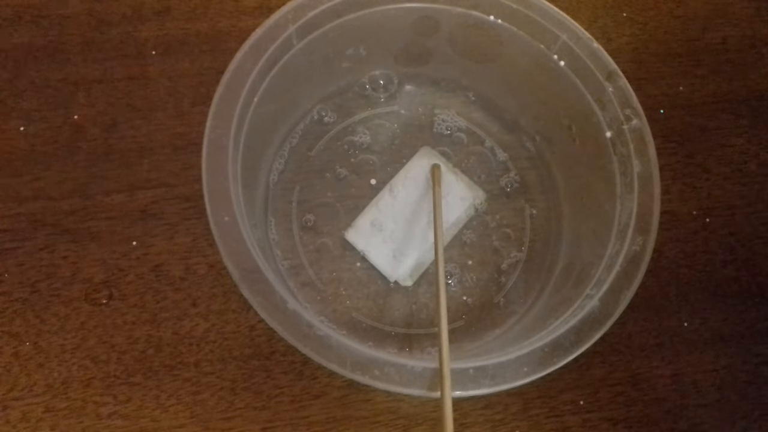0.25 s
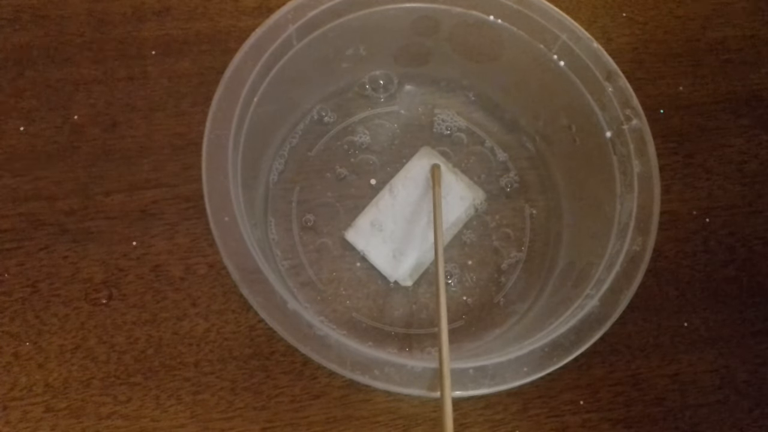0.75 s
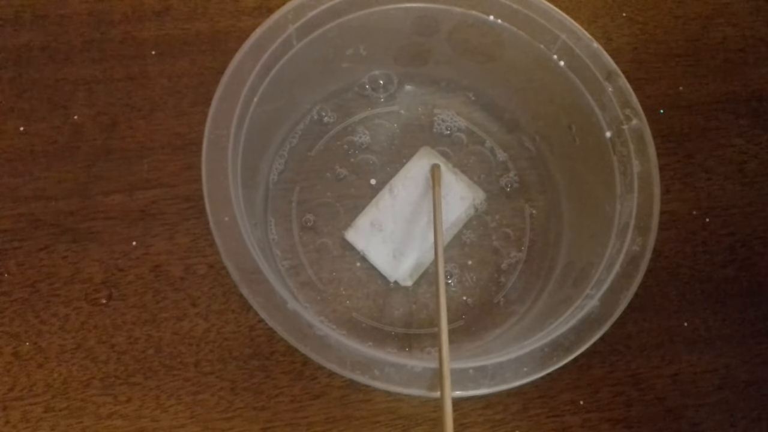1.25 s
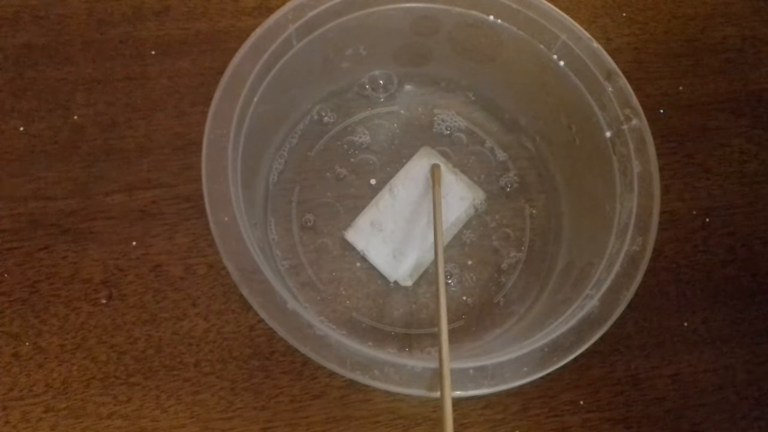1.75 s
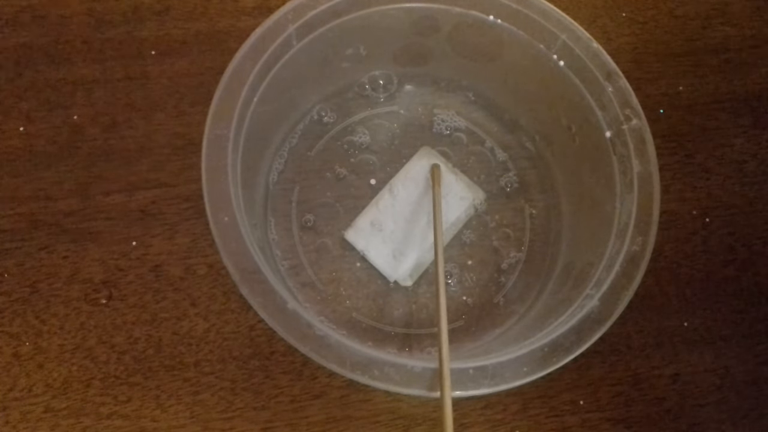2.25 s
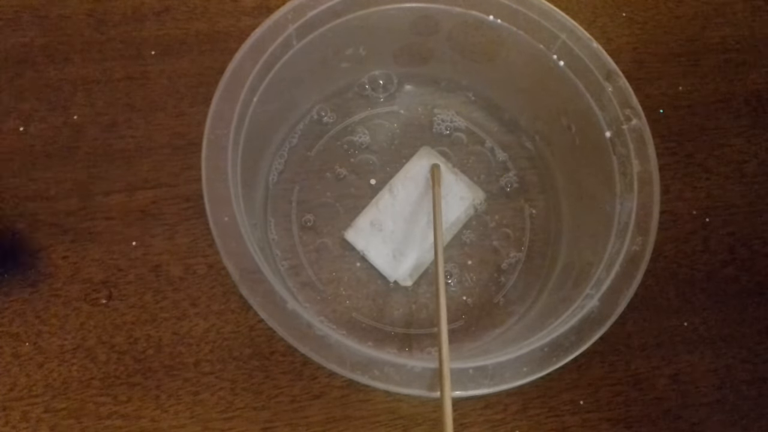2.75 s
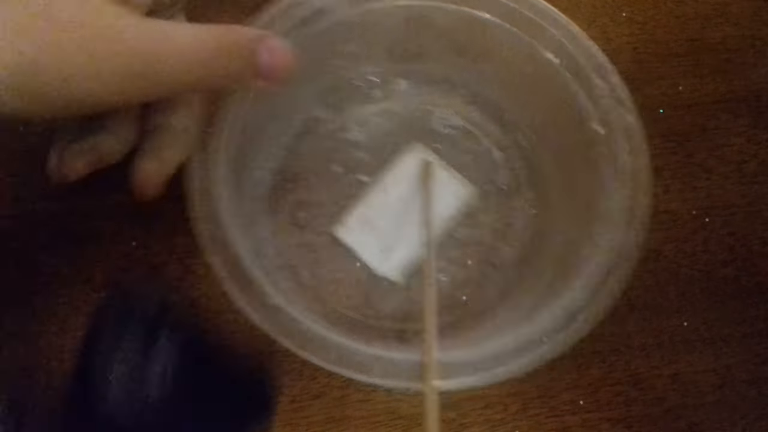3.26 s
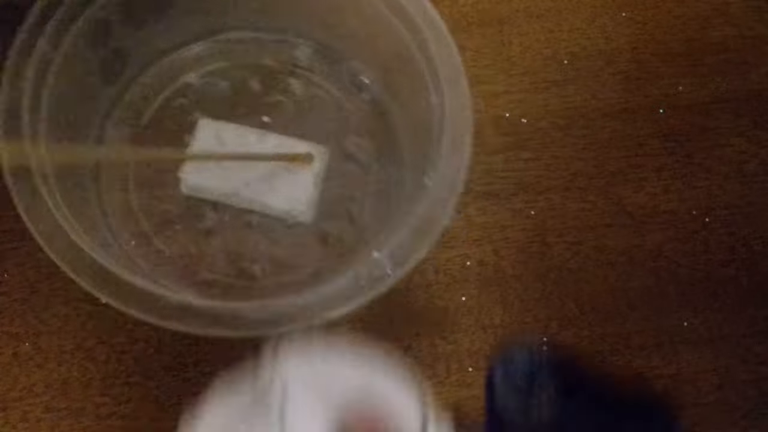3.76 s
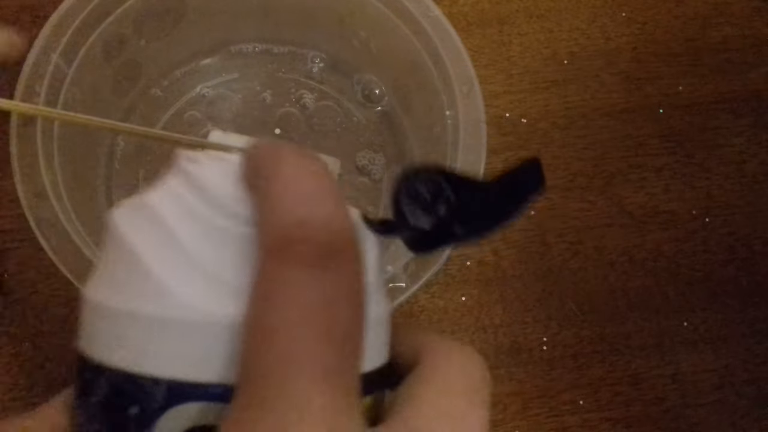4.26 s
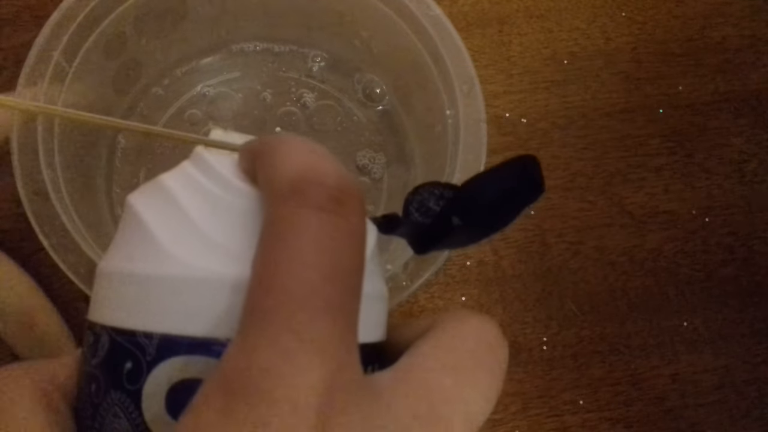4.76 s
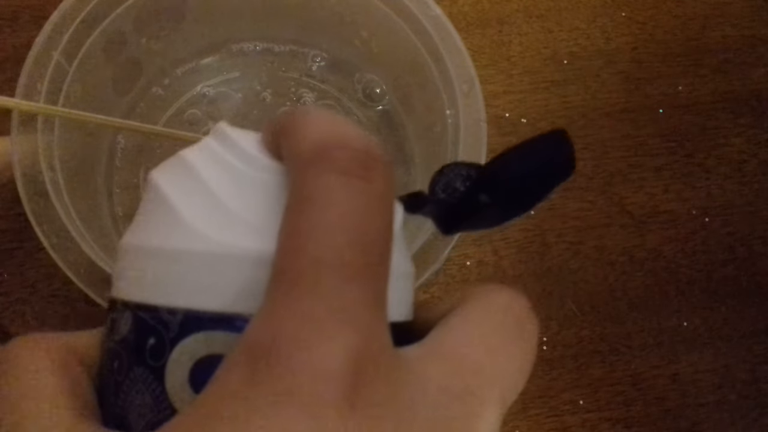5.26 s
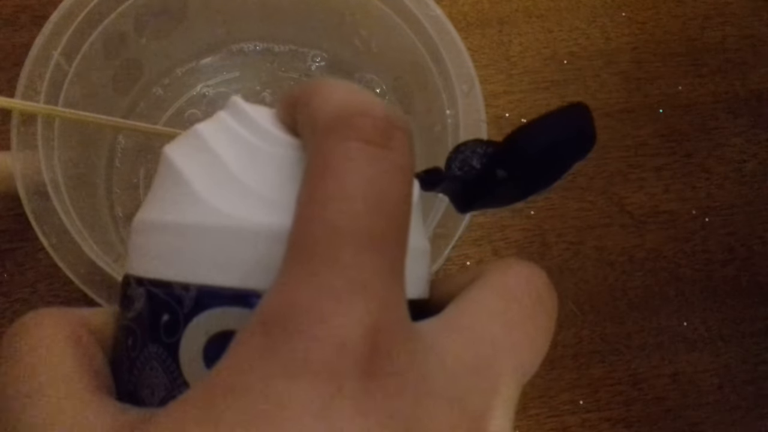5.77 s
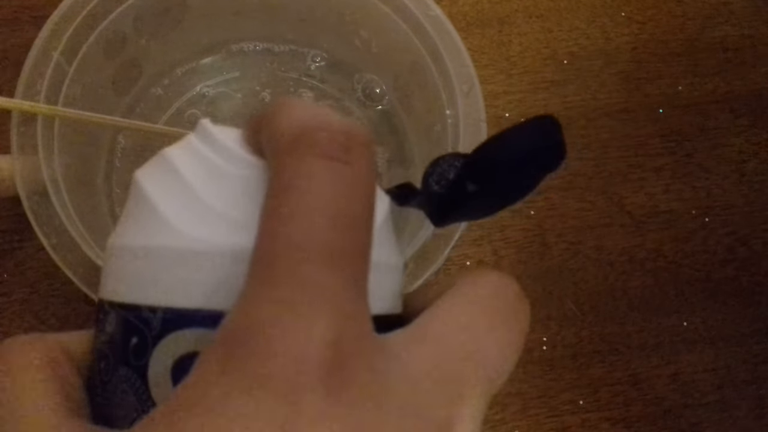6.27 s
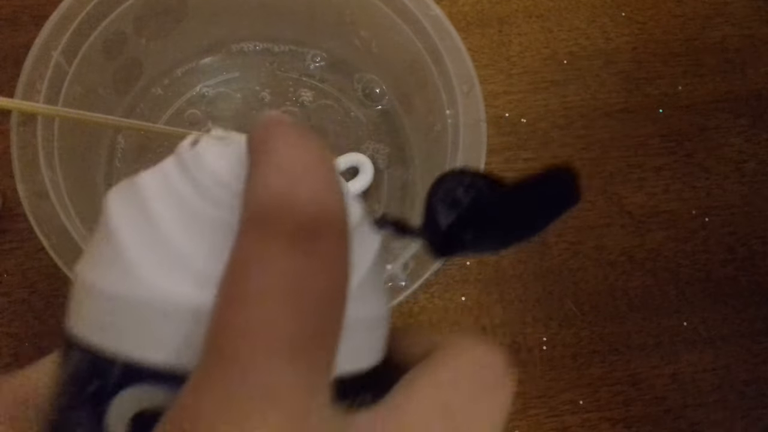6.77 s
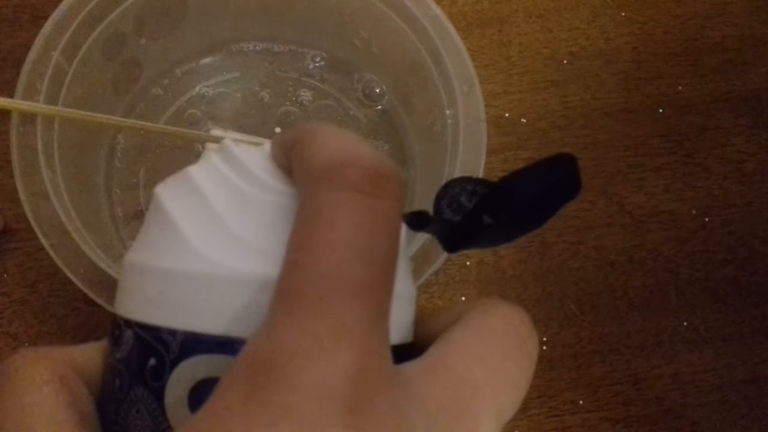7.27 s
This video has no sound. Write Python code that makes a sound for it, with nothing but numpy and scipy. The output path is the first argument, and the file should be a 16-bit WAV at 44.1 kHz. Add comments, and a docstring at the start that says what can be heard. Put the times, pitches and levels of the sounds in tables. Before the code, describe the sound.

Light scraping, ticks and knocks of a can on wood, followed by close, fizzy bursts of spraying foam in a quiet room.

```python
"""A small quiet room, heard from close by and almost in mono. A can of foam is dragged over a wooden
table, handled and knocked down beside a plastic bowl, which is pushed aside. Friction makes trains of
tiny impulses; each blow makes a clack and sets the modes of the table top ringing. The valve spits,
then foam hisses out in several presses: countless tiny bubbles burst and excite the resonances of
the nozzle, while the escaping gas whistles and the growing heap gurgles."""
import sys
import numpy as np
from scipy import signal
from scipy.fft import rfft, irfft
from scipy.io import wavfile

SR = 44100
rng = np.random.default_rng(int(sys.argv[2]) if len(sys.argv) > 2 else 0)


def to_wav(sig):
    """Store sig (one row per channel, or 1-D mono) as 16-bit WAV at the path in sys.argv[1].

    Samples outside -1..1 are clipped; the rate is SR.
    """
    pcm = np.clip(np.atleast_2d(sig), -1, 1) * 32767
    pcm = np.round(pcm).astype(np.int16)
    wavfile.write(sys.argv[1], SR, pcm.T)  # frames by channels


N = 331218
TIME = np.arange(N) / SR

# Levels in the tables are relative: each source applies its own gain afterwards.
# Spectra of the room tone and of its faint stereo hiss: frequency_hz, density_db
ROOM_TONE_SPECTRUM = [(25, -10.5), (55, -9), (100, -11), (140, -5.5), (250, -8), (450, -7.5), (826, -9.5),
                      (1340, -12.5), (1900, -13.5), (3000, -21.5), (4200, -17), (5500, -24.5),
                      (9500, -27.5), (15500, -28.5)]
SIDE_SPECTRUM = [(30, -18.5), (120, -4), (1000, -5.5), (3000, -12.5), (15000, -20.5)]
# Reverberation time of the room: frequency_hz, t60_s
ROOM_DECAY = [(100, 0.75), (400, 0.3), (1500, 0.48), (4500, 0.18), (12000, 0.42)]
# Strokes of the can on the table and of the fingers on the can: peak_s, level_db, rise_s, fall_s
DRAG_STROKES = [(0.03, -46, 0.29, 0.13), (0.162, -45.5, 0.038, 0.09), (0.265, -44.5, 0.16, 0.24),
                (0.41, -45, 0.014, 0.048), (0.442, -47.5, 0.066, 0.054), (0.533, -41, .07, 0.078)]
RUB_STROKES = [(0.64, -60, 0.14, 1), (0.852, -52.5, 0.23, 0.12), (1.062, -54.5, 0.059, 0.042),
               (1.23, -61, 0.2, 0.31), (1.46, -63, 0.67, 0.38), (1.655, -64, 0.035, .06),
               (1.845, -56, 0.15, 0.42), (1.93, -56, 0.088, 0.15), (2.005, -48.5, 0.033, 0.067),
               (2.31, -57, 0.034, 0.046), (2.45, -59, 0.15, 0.43), (2.72, -62.5, 0.47, 0.77),
               (3.02, -64.5, 0.27, 0.53), (3.895, -46, 0.28, 0.1), (4.05, -70.5, .1, 0.6),
               (4.19, -54, 0.02, 0.083)]
# Spectra of the dragging, rubbing and tin clack, including the microphone's 4.2 kHz ring:
# frequency_hz, density_db
DRAG_SPECTRUM = [(59, -14), (100, -12), (272, -13), (353, -3), (517, -8.5), (607, -2.5), (657, -1),
                 (853, 0), (1650, -7.5), (2100, -0.5), (2620, -6), (2890, -11.5), (4320, 0.5),
                 (6070, -21.5), (12000, -40.5), (15600, -75), (22000, -120)]
RUB_SPECTRUM = [(300, -16.5), (1400, -15), (2000, -10), (2450, -9), (2900, -12.5), (3450, -7), (4150, 0.5),
                (4800, -6), (5600, -17), (8000, -34), (15000, -40.5)]
CLACK_SPECTRUM = [(500, -20), (1000, -2), (1400, -4), (1750, -5), (2050, -3.5), (2300, -2), (2600, -2),
                  (3100, -3.5), (4100, 3), (4800, -3), (5600, -13.5), (6300, -17.5), (7200, -29),
                  (15000, -49)]
# Light ticks and pops of the can, cap and trigger: start_s, level_db, pitch_hz, width_hz
SNAPS = [(0.085, -35, 2170, 2000), (0.137, -39, 1860, 2000), (.2350, -31, 4020, 1480),
         (.4046, -45, 2180, 2000), (0.522, -30, 1970, 1200), (1.1057, -39.5, 3650, 900),
         (1.2268, -39, 4900, 700), (1.9940, -29.5, 4040, 600), (2.0003, -31.5, 3560, 1000),
         (2.1510, -38, 3500, 2000), (2.4896, -43, 4070, 600), (3.2730, -49, 4170, 900),
         (3.963, -32, 4300, 593), (3.985, -46, 4170, 900), (5.305, -29, 3980, 700), (5.548, -50, 3800, 600),
         (6.4765, -38, 4100, 1820), (6.5249, -36.5, 1150, 218), (6.5244, -39.5, 3850, 2500),
         (7.3742, -32, 3820, 700)]
# Knocks on the table and bumps of the sliding bowl:
# start_s, clack_db, clack_hz, broadband_db, decay_s, wood_db, wood_hz, thump_db
BLOWS = [(1.3870, -40.5, 4170, 0.5, 0.0047, -40, 563, -60.5),
         (2.1569, -28.5, 2690, -26, 0.017, -72, 500, -82),
         (3.2920, -35.5, 3680, -7.5, 0.0016, -50.5, 395, -50),
         (3.38, -38, 3500, -5, 0.0016, -45.5, 400, -42.5), (3.497, -41, 3500, -5, .002, -37, 400, -41.5),
         (3.7651, -20, 3600, 5, 0.0024, -20, 410, -33), (4.2620, -27.5, 1550, -18.5, 0.0043, -41, 487, -62),
         (4.737, -45, 2000, -3, .002, -52, 400, -48), (4.778, -45.5, 2000, 14, 0.0015, -41, 383, -40),
         (4.914, -47, 2000, 4, 0.0013, -52.5, 387, -66)]
# Modes of the table top under the can, and its deep modes: pitch_hz, level_db, t60_s
WOOD_MODES = [(343, -3.5, 0.075), (411, -4, 0.073), (439, 1.5, 0.081), (493, 3, 0.064), (545, -1, 0.11),
              (602.6, 3, 0.05), (741, 0.5, 0.039), (860, 3, 0.024), (983, 1, 0.067), (1190, -6.5, 0.053),
              (1470, -5.5, 0.026)]
THUMP_MODES = [(85.4, 1, 0.1), (97, -13.5, .16), (135, -3.5, 0.077), (160, -3, 0.12), (206, -3, 0.086),
               (245, -4, 0.25), (296, -3.5, 0.26), (373, -13, 0.099)]
# Shoves that push the bowl over the table: peak_s, scrape_db, judder_db, rise_s, fall_s
BOWL_SHOVES = [(3.398, -42.5, -42, 0.053, .06), (3.48, -36, -42, 0.12, .115), (3.66, -53.5, -66, .3, 1)]
# Spectra of the scrape and of the table top's judder, as heard: frequency_hz, density_db
SCRAPE_SPECTRUM = [(400, -22), (950, -10.5), (1400, -12.5), (1800, -8.5), (2070, -4), (2400, -12),
                   (3300, -6), (4400, 2), (5000, -7.5), (6000, -21.5), (9000, -35), (15000, -46)]
JUDDER_SPECTRUM = [(45, -40.5), (62, -12.5), (80, 1), (110, -13), (170, -18), (245, -1), (300, -2),
                   (380, -9), (500, -1.5), (650, -21), (1000, -15.5), (2500, -52), (6000, -82)]
# Gas spitting from the opening valve: start_s, level_db, swell_s, fall_s, pitch_hz, broadband_db
VALVE_SPITS = [(4.571, -39.5, 0.031, .013, 990, -11), (4.625, -30, 0.017, 0.071, 4260, -3.5),
               (4.654, -21.5, 0.0051, 0.026, 4050, -5), (4.673, -25.5, 0.0046, 0.004, 4750, -3.5),
               (4.712, -29, 0.0079, 0.03, 2800, -5), (4.7232, -22.5, 0.0016, 0.0046, 3380, -18)]
# Spectra of the spits, the finest bubbles and the turbulent jet: frequency_hz, density_db
SPIT_SPECTRUM = [(400, -26.5), (950, -2), (1350, -17.5), (2050, -3), (2900, -7), (3850, 5.5), (5050, -1.5),
                 (5300, -11.5), (5700, -4.5), (6400, -29.5), (7900, -25), (9200, -18.5), (12300, -35),
                 (14000, -36), (15700, -36)]
FIZZ_SPECTRUM = [(3000, -18), (6500, 2.0), (10800, -7.5), (12000, -10.5), (15000, -7)]
JET_SPECTRUM = [(200, -11.5), (1500, -9), (2900, -11.5), (4000, -3.5), (7000, -4), (15000, -58)]
# Presses of the trigger: start_s, end_s, attack_s, release_s, final_hiss_db, swell_db, fizz_lag_s,
# then, relative to the hiss, fizz_db, whistle_db, gurgle_db
TRIGGER_PRESSES = [ (4.752, 5.432, .01, 0.0068, -44.5, 3, 1, -10.5, -17, -32),
                   (5.575, 5.782, .012, 0.015, -45.5, 1.9, .1, -10.5, -6.5, -36),
                   (5.799, 5.872, 0.0078, 0.02, -42, 1.2, 0.019, -8.5, -5, -47),
                   (5.91, 6.394, 0.027, 0.021, -42.5, 3.2, 0.01, -11, -2.5, -13),
                   (7.254, 7.354, 0.0015, 0.018, -45, 10.4, .1, -20, -9, -18),
                   (7.375, 7.52, 0.0046, .01, -44, 2, 0.11, -13, -3.5, -10), ]
# Resonances of the nozzle, finest bubbles, singing gas and heap of foam: pitch_hz, width_hz, level_db
NOZZLE_MODES = [(2080, 340, -21.5), (2510, 180, -10.5), (3114, 660, -9), (3757, 236, 3.5), (4250, 116, 2),
                (4610, 260, -2), (5300, 290, -11.5), (5560, 200, -8.5), (6820, 33, -9)]
FIZZ_MODES = [(6810, 150, -1.5), (7050, 160, -13), (7720, 100, -8), (8660, 380, -2.5), (8920, 570, 1.5),
              (9630, 170, -5.5), (9950, 230, 2.5), (10840, 150, 1), (11650, 300, -6), (13500, 450, -11)]
WHISTLE_MODES = [(4850, 125, 0)]
GURGLE_MODES = [(440, 210, 2.5), (1020, 124, 8), (2190, 330, 1)]

BOWL_STOPS_S, BOWL_BRAKES_S = 3.95, 0.2
SPIT_SWELL_DB = 15   # each spit starts this far under its peak
LEAK_DB, LEAK_FALL_S = -17, 0.22   # and leaves a leak that dies away
FIZZ_LAG_DB = 12   # the finest bubbles start this much weaker and catch up
GURGLE_DB_PER_S = 20.5   # the gurgle grows as foam heaps up round the nozzle


def from_db(db):
    """The decibel scale: 20 dB is a factor of ten in amplitude."""
    return 10 ** (np.asarray(db) / 20)


def rms_one(x):
    """Normalisation to unit mean power."""
    return x / np.sqrt(np.mean(x ** 2) + 1e-20)


def at_hz(points, hz):
    """Interpolation of a curve on a logarithmic frequency axis."""
    frequencies, values = np.transpose(points)
    return np.interp(np.log(np.maximum(hz, 1)), np.log(frequencies), values)


def coloured(x, spectrum, size=4096):
    """Minimum-phase filtering: a causal response with this spectrum; white noise keeps its power."""
    hz = np.fft.rfftfreq(size, 1 / SR)
    cepstrum = irfft(np.log(from_db(at_hz(spectrum, hz))))
    cepstrum[1:size // 2] *= 2   # fold on to positive time
    cepstrum[size // 2 + 1:] = 0
    response = irfft(np.exp(rfft(cepstrum)))
    return signal.oaconvolve(x, response / np.linalg.norm(response))[:len(x)]


def resonate(x, modes):
    """Forced resonance: parallel band-passes (pitch_hz, width_hz, level_db) of alternating sign."""
    out = 0
    for k, (hz, width_hz, db) in enumerate(modes):
        radius = np.exp(-np.pi * width_hz / SR)
        poles = [1, -2 * radius * np.cos(2 * np.pi * hz / SR), radius ** 2]
        gain = (-1) ** k * from_db(db) * (1 - radius ** 2) / 2
        out += gain * signal.lfilter([1, 0, -1], poles, x + 1e-18)
    return out


def ring(x, modes):
    """Free vibration: an impulse leaves each mode (pitch_hz, level_db, t60_s) as a damped sine."""
    out = 0
    for k, (hz, db, t60_s) in enumerate(modes):
        radius, angle = from_db(-60 / (t60_s * SR)), 2 * np.pi * hz / SR
        poles = [1, -2 * radius * np.cos(angle), radius ** 2]
        out += (-1) ** k * from_db(db) * signal.lfilter([0, np.sin(angle)], poles, x + 1e-18)
    return out


def drift(rate_hz):
    """Random modulation: straight lines between Gaussian values drawn at the given rate; rms 1."""
    return rms_one(np.interp(TIME * rate_hz, np.arange(N), rng.standard_normal(N)))


def grains(per_s, spread_db, clump_db, clump_hz):
    """Shot noise: random impulses whose sizes scatter and swell in clumps; rms 1."""
    born = rng.random(N) < per_s / SR
    scatter_db = spread_db * np.minimum(rng.exponential(1, N), 4)
    sizes = from_db(scatter_db + clump_db * np.clip(drift(clump_hz), -2, 2))
    return rms_one(born * sizes * rng.choice([-1, 1], N))


def strokes(rows):
    """Incoherent addition: strokes sum in power, each rising 20 dB in rise_s and falling 20 in fall_s."""
    power = 0
    for peak_s, db, rise_s, fall_s in rows:
        decades_down = np.maximum((peak_s - TIME) / rise_s, (TIME - peak_s) / fall_s)
        power += from_db(db - 20 * np.minimum(decades_down, 10)) ** 2
    return np.sqrt(power)


def rattle(decay_s, size=8192):
    """High modal density: a struck thin shell vibrates like exponentially decaying noise."""
    return rng.choice([-1, 1], size) * np.exp(-TIME[:size] / decay_s)


def add(out, start_s, sound):
    """Superposition: a short sound joins the mix at its start time."""
    start = round(start_s * SR)
    out[start:start + len(sound)] += sound[:N - start]


def room_tone():
    """Mid and side: steady noise common to both channels, with a faint hiss in opposite phase."""
    mid = from_db(-68) * coloured(rng.standard_normal(N), ROOM_TONE_SPECTRUM)
    side = from_db(-72.5) * coloured(rng.standard_normal(N), SIDE_SPECTRUM)
    return mid + side * np.array([[1], [-1]])


def can_dragging():
    """Roughness noise: the rim of the can catches on the grain of the wood, stroke by stroke."""
    catches = grains(per_s=3500, spread_db=0, clump_db=1.5, clump_hz=180)
    return strokes(DRAG_STROKES) * coloured(catches, DRAG_SPECTRUM)


def plastic_ticks():
    """Impulse response: small plastic parts snap, each with one heavily damped resonance."""
    out = np.zeros(N)
    lowpass = signal.butter(8, 5300, fs=SR, output="sos")
    for start_s, db, hz, width_hz in SNAPS:
        snap = resonate(rattle(decay_s=0.0022), [(hz, width_hz, 0)])
        snap = resonate(snap, [(hz, 3 * width_hz, 0)])   # steepens the skirts
        snap = signal.sosfilt(lowpass, snap)
        add(out, start_s, from_db(db - 2.5) * snap / np.abs(snap).max())
    return out


def finger_rubbing():
    """Sliding friction: skin slips over the can in fine, faint impulses."""
    slips = grains(per_s=6500, spread_db=0, clump_db=2, clump_hz=230)
    return from_db(-1.2) * strokes(RUB_STROKES) * coloured(slips, RUB_SPECTRUM)


def table_knocks():
    """Impact excitation: each knock or bump clacks and rings the table's modes at its own woody pitch."""
    clacks, wood, thump = np.zeros((3, N))
    force = np.pad(signal.windows.hann(15) / 7, (0, 2000))   # contact pulse of unit area
    for start_s, clack_db, clack_hz, broadband_db, decay_s, wood_db, wood_hz, thump_db in BLOWS:
        shell = rattle(decay_s) + from_db(-25) * rattle(decay_s=0.034)
        shell *= np.minimum(TIME[:len(shell)] / 0.00056, 1)
        shell = from_db(broadband_db) * shell + resonate(shell, [(clack_hz, 1100, 0)])
        add(clacks, start_s, from_db(clack_db) * coloured(shell, CLACK_SPECTRUM))
        tuned_force = from_db(-7) * force + resonate(force, [(wood_hz, 130, -2)])
        add(wood, start_s, from_db(wood_db) * tuned_force)
        add(thump, start_s, from_db(thump_db) * force)
    return clacks + from_db(-4.5) * ring(wood, WOOD_MODES) + from_db(-2) * ring(thump, THUMP_MODES)


def bowl_sliding():
    """Stick-slip friction: the bowl scrapes and shakes the table top until it comes to rest."""
    scrape = strokes([(s, db, rise_s, fall_s) for s, db, _, rise_s, fall_s in BOWL_SHOVES])
    judder = strokes([(s, db, rise_s, fall_s) for s, _, db, rise_s, fall_s in BOWL_SHOVES])
    grit = coloured(grains(per_s=5000, spread_db=-2.5, clump_db=2, clump_hz=180), SCRAPE_SPECTRUM)
    shake = coloured(grains(per_s=1400, spread_db=1.5, clump_db=6.5, clump_hz=20), JUDDER_SPECTRUM)
    moving = np.clip((BOWL_STOPS_S - TIME) / BOWL_BRAKES_S, 0, 1)
    return moving * (scrape * grit + judder * shake)


def valve_spitting():
    """Transient flow: gas breaks through the first foam in bursts, each with a squeaky resonance."""
    gas = grains(per_s=9000, spread_db=-0.5, clump_db=-1.5, clump_hz=620)
    out = 0
    for start_s, db, swell_s, fall_s, hz, broadband_db in VALVE_SPITS:
        age_s = TIME - start_s
        opening = (age_s > 0) * from_db(SPIT_SWELL_DB * np.clip(age_s / swell_s - 1, -1, 0))
        past_peak_s = np.clip(age_s - swell_s, 0, 1)
        collapse = from_db(-20 * past_peak_s / fall_s)
        leak = from_db(LEAK_DB - 20 * past_peak_s / LEAK_FALL_S)
        burst = from_db(db) * opening * np.roll(gas, rng.integers(N))
        squeak = resonate(np.maximum(collapse, leak) * burst, [(hz, 900, 0)])
        out += from_db(broadband_db) * collapse * burst + squeak
    return coloured(out, SPIT_SPECTRUM)


def trigger_gains():
    """Amplitude envelopes of hiss, fizz, whistle and gurgle: the valve opens, flow swells, it shuts."""
    gains = np.zeros((4, N))
    for (start_s, end_s, attack_s, release_s, hiss_db, swell_db,
         lag_s, fizz_db, whistle_db, gurgle_db) in TRIGGER_PRESSES:
        age_s = np.maximum(TIME - start_s, 0)
        left_s = np.clip(end_s - TIME, 0, end_s - start_s)
        opening = np.sqrt(np.minimum(age_s / attack_s, 1))
        closing = from_db(-20 * np.clip((TIME - end_s) / release_s, 0, 10))
        flow = opening * closing * from_db(hiss_db - swell_db * left_s / (end_s - start_s))
        fizz = flow * from_db(fizz_db - FIZZ_LAG_DB * np.exp(-age_s / lag_s))
        gurgle = flow * from_db(gurgle_db - GURGLE_DB_PER_S * left_s)
        gains += [flow, fizz, flow * from_db(whistle_db), gurgle]
    return gains


def foam():
    """Source and filter: bursting bubbles and rushing gas drive resonances; the flow comes in lumps."""
    hiss_gain, fizz_gain, whistle_gain, gurgle_gain = trigger_gains()
    lumps = rms_one(from_db(0.78 * drift(rate_hz=190)))
    bursts = grains(per_s=7000, spread_db=4.5, clump_db=2.5, clump_hz=450)
    fizz = sum(resonate(grains(per_s=9700, spread_db=4.5, clump_db=2.5, clump_hz=160), [mode])
               for mode in FIZZ_MODES)
    fizz = rms_one(coloured(fizz, FIZZ_SPECTRUM))
    whistle = resonate(rng.standard_normal(N), WHISTLE_MODES)
    whistle = rms_one(resonate(whistle, [(4500, 3900, 0)]))   # steepens the skirts
    turbulence = coloured(rng.standard_normal(N), JET_SPECTRUM)
    hiss = from_db(-0.4) * (rms_one(resonate(bursts, NOZZLE_MODES)) + from_db(-14) * turbulence)
    gurgle = rms_one(resonate(bursts, GURGLE_MODES))
    return lumps * (hiss_gain * hiss + fizz_gain * fizz + whistle_gain * whistle + gurgle_gain * gurgle)


def reverberation(x, size=26000, bands=8):
    """Diffuse field: the room's echoes are octave bands of noise, each dying at its own rate."""
    t, tail = TIME[:size], 0
    edges_hz = np.geomspace(60, 16000, bands + 1)
    for low, high in zip(edges_hz, edges_hz[1:]):
        bandpass = signal.butter(2, [low, high], "band", fs=SR, output="sos")
        t60_s = at_hz(ROOM_DECAY, np.sqrt(low * high))
        tail += signal.sosfilt(bandpass, rng.standard_normal(size)) * from_db(-60 * t / t60_s)
    tail *= np.clip(t / 0.0046 - 0.5, 0, 1)   # echoes build up after the direct sound
    return signal.oaconvolve(x, tail / np.linalg.norm(tail))[:N]


def scene():
    """Direct and reverberant sound: blows on the table fill the room more than the close nozzle does."""
    blows = table_knocks()
    spray = foam() + valve_spitting()
    ticks = plastic_ticks()
    friction = can_dragging() + finger_rubbing() + bowl_sliding()
    echoes = reverberation(from_db(-8) * blows + from_db(-13) * (friction + ticks) + from_db(-12) * spray)
    return blows + friction + ticks + spray + echoes + room_tone()


def record(dry):
    """Band limiting: the microphone loses the deepest bass, and the top is cut steeply."""
    highpass = signal.butter(4, 62, "high", fs=SR, output="sos")
    lowpass = signal.ellip(12, 0.1, 70, 15800, fs=SR, output="sos")
    return signal.sosfilt(lowpass, signal.sosfilt(highpass, dry))


dry = scene()
out = record(dry)
to_wav(out)
```